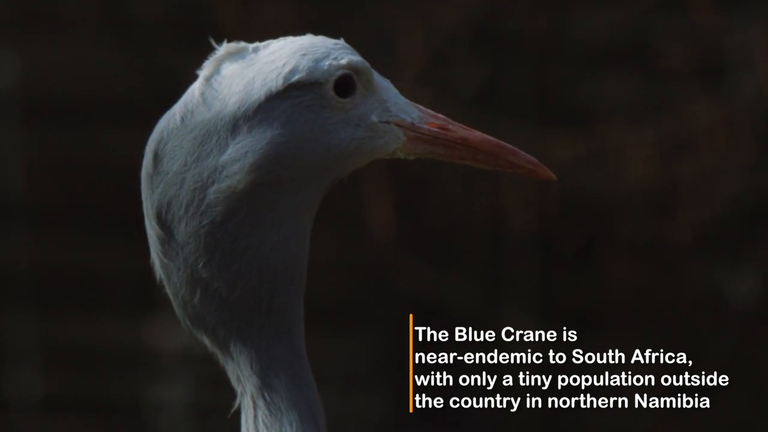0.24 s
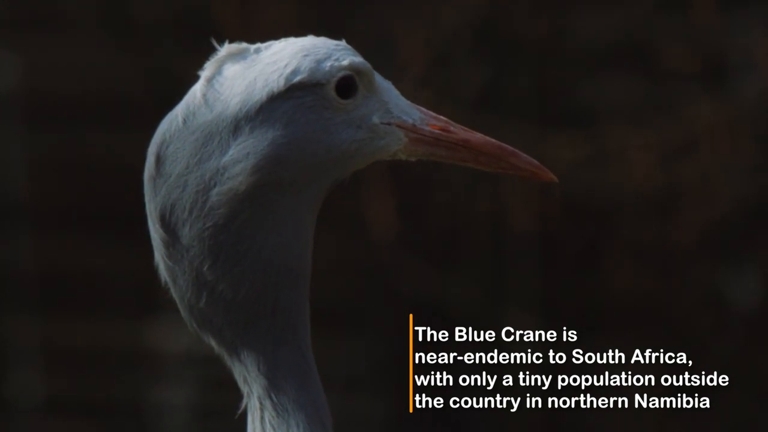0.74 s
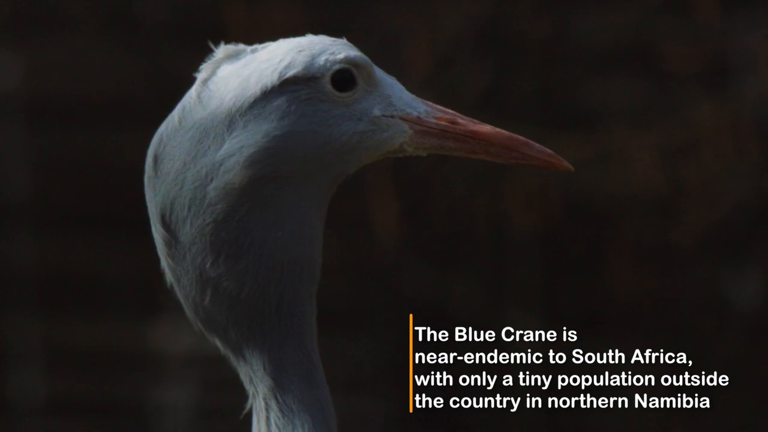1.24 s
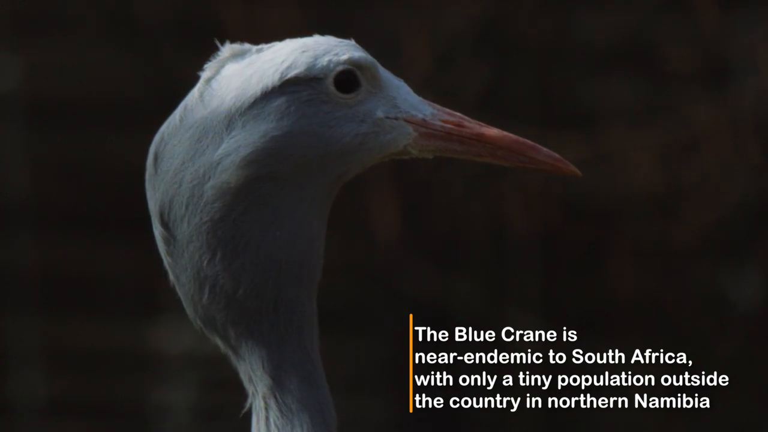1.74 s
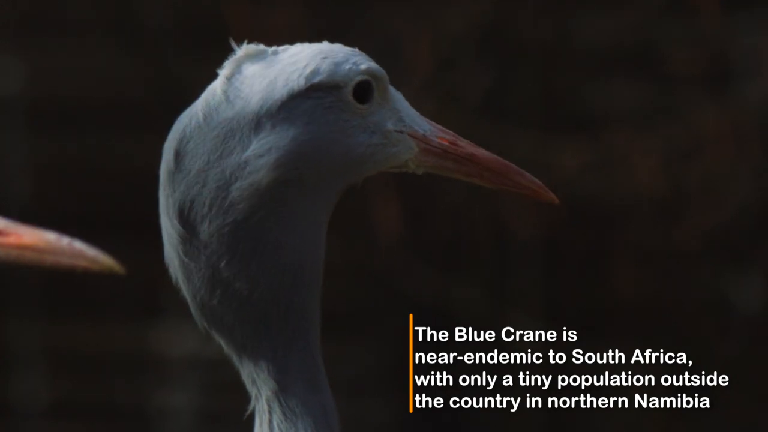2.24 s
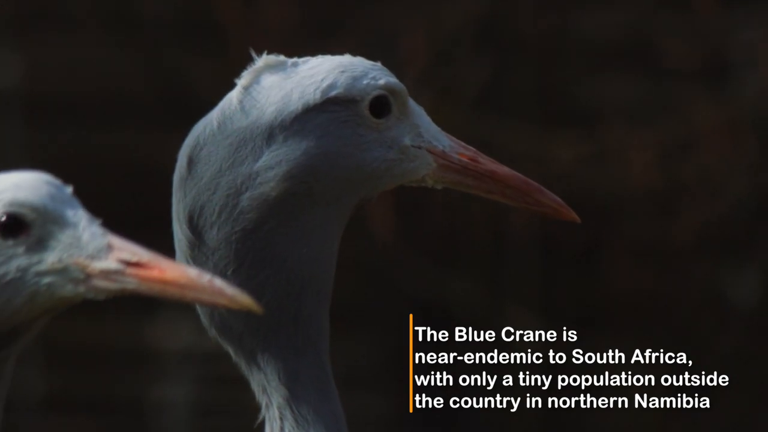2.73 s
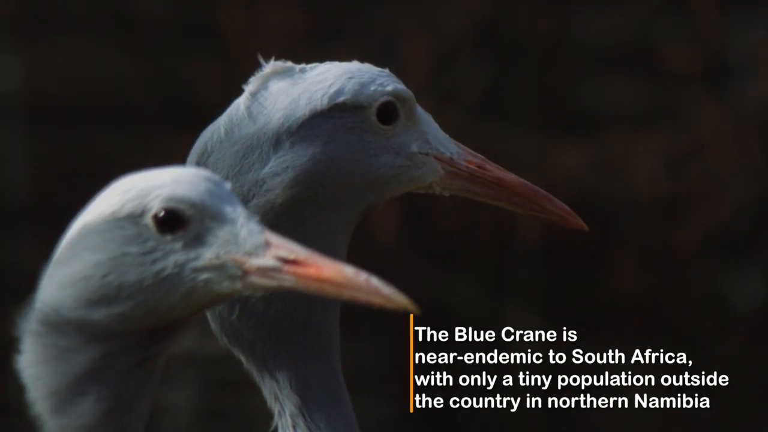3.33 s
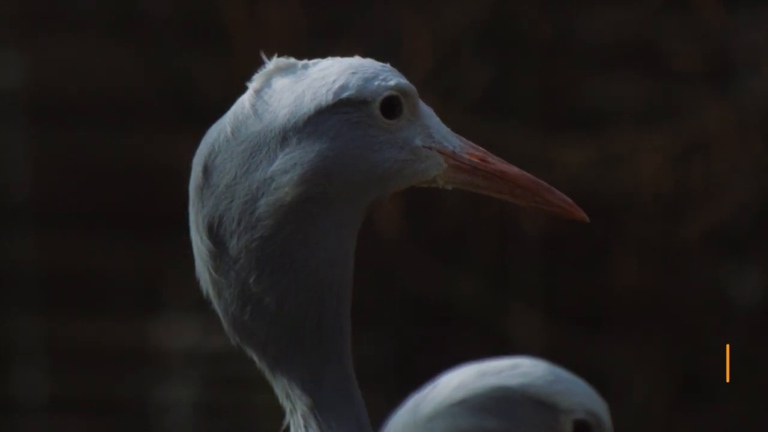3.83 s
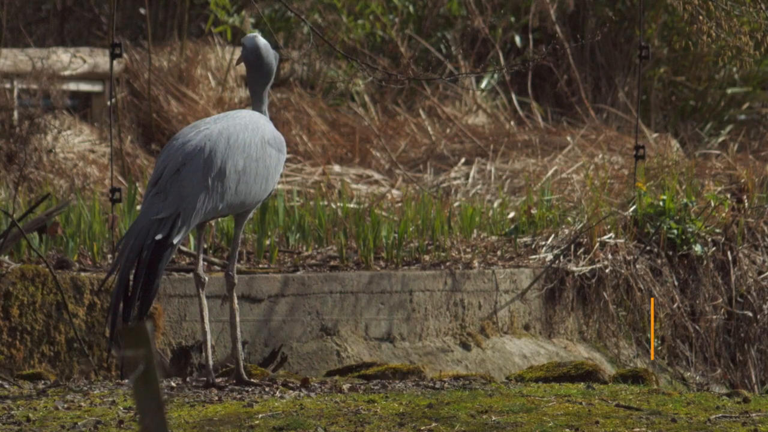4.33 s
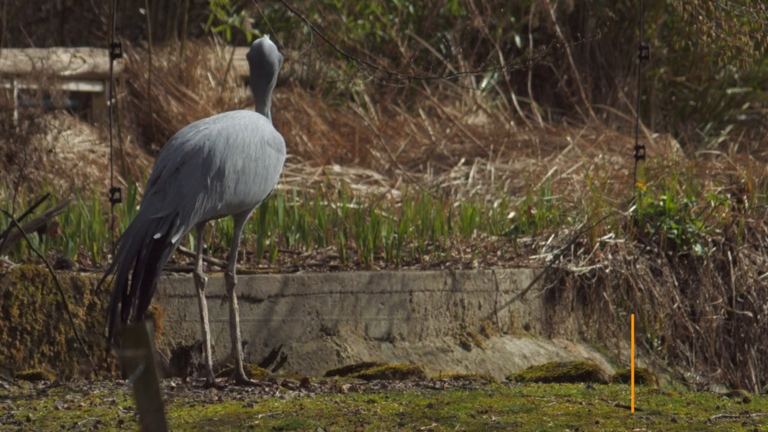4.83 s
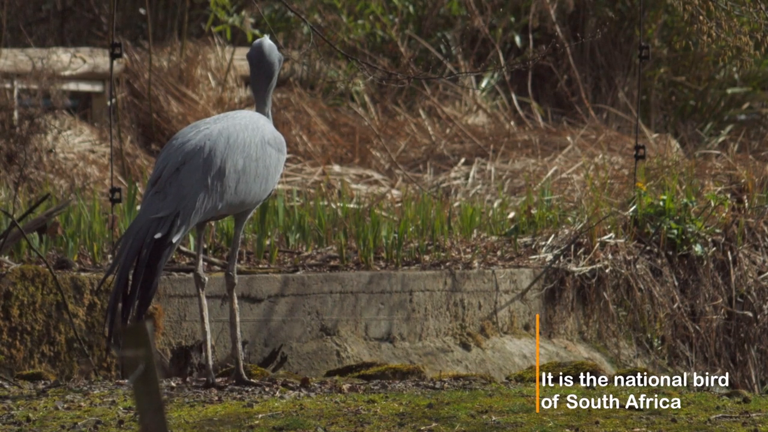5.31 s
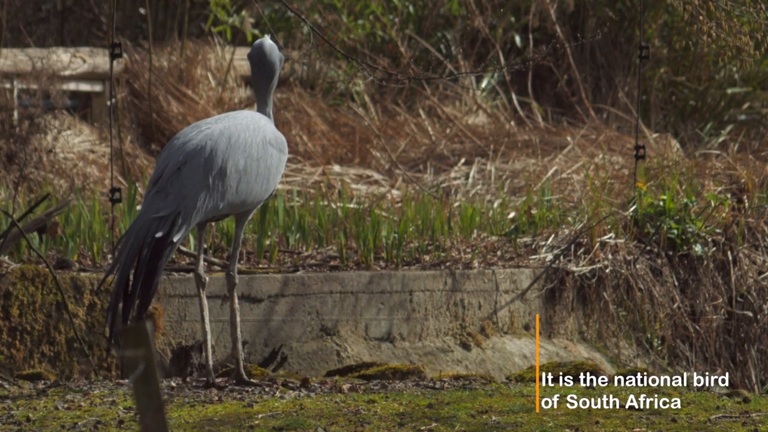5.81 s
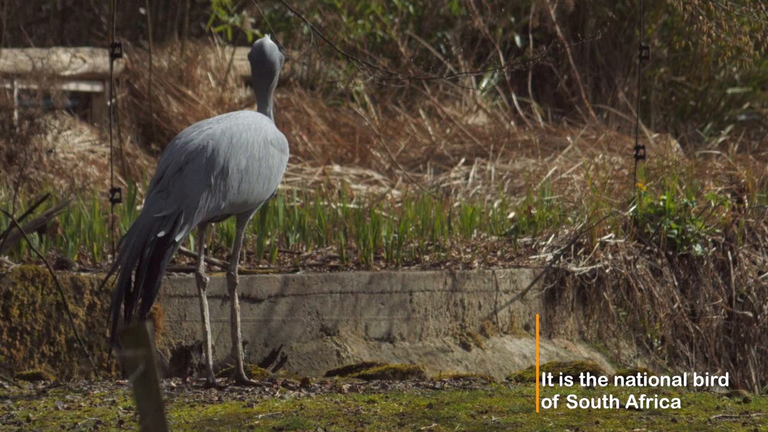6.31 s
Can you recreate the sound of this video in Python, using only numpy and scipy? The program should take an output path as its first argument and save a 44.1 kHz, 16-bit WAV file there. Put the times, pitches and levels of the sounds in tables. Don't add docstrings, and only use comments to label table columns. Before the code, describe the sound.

A quiet open outdoor place with soft, wide air hiss and faint distant birds chirping and warbling. At about 0.5 s something hollow is tapped dully once. From 0.9 to 1.4 s a nearby songbird gives thin, high falling whistles and quick flicks, then from 1.4 to 3.05 s a fast, steady trill of clear falling notes, about thirteen a second. At 2.9 s a deep-voiced crane swells into a loud, rasping rattle of about ten rapid croaks, overlapped from 3.1 to 3.6 s by a higher crane. The deep bird calls again at 3.85-4.3 s, the higher at 4.1-4.6, deep at 4.75-5.2, higher at 5.4-5.9, and deep at 5.7-6.2. Each run starts weaker, rises in pitch, then sags and usually fades. Faint far chirps and a high warble close the last 0.4 s. Cranes sound close and central, with short reflections from ground and bushes.

```python
import sys
import numpy as np
from scipy import signal
from scipy.fft import rfft, irfft
from scipy.io import wavfile
from scipy.ndimage import uniform_filter1d, map_coordinates

SR = 44100
rng = np.random.default_rng(int(sys.argv[2]) if len(sys.argv) > 2 else 0)


def digitize_waveform(pressure):
    field = np.atleast_2d(pressure).T
    bounded = np.clip(field, -1, 1)
    quanta = np.round(bounded * 32767).astype(np.int16)
    wavfile.write(sys.argv[1], SR, quanta)


def ratio(d):
    e = np.asarray(d, float) / 20
    return 10 ** e


N = 289296

# [pitch_hz, density_db per Hz]
AIR = [(12, -38), (20, -2.5), (103, 0), (362, -0.5), (686, -4), (932, -5.5), (2150, -14), (7310, -23),
       (14300, -24), (15500, -25)]
# [pitch_hz, likeness -1..1]
ALIKE = [(60, -0.79), (700, -0.5), (1500, -0.3), (3000, 0.24), (7000, 0.5), (15000, -0.0035)]
# [time_s, level_db]
TWITTER = [(0, -74.5), (.8, -82), (3, -76), (4.3, -74.5), (4.35, -64), (4.42, -77), (4.57, -65), (4.7, -86),
           (6.2, -70.5), (6.56, -71.5)]
# [pitch_hz, density_db per Hz]
CHORUS = [(2500, -29), (3500, -12.5), (4200, -3), (5000, 0), (5700, -10.5), (6300, -12), (9000, -44)]
# [pitch_hz, density_db per Hz]
KNOCK = [(120, -33), (250, -7), (680, 6), (1100, -7.5), (2000, -8), (2700, -40)]

# [start_s, end_s, start_hz, end_hz, level_db]
GLIDES = [(0, 0.11, 5330, 2930, -66), (.163, .276, 2820, 2870, -73), (.557, .644, 8400, 6530, -76),
          (.63, .685, 4900, 3200, -68), (.645, .69, 3820, 3450, -62.5), (.468, .5, 5900, 5100, -72),
          (.676, .694, 4700, 4900, -68), (.681, .708, 3780, 4450, -65), (.8, 1.03, 2490, 2740, -73.5),
          (1.172, 1.203, 5230, 4640, -62), (.36, 0.44, 7150, 7000, -83), (1.24, 1.272, 5100, 4600, -65),
          (1.196, 1.285, 4440, 3930, -72), (5.38, 5.41, 5440, 4600, -69), (6.215, 6.275, 5000, 6000, -66.5),
          (6.27, 6.36, 5860, 5680, -70), (6.505, 6.53, 4600, 4450, -79), (6.347, 6.372, 5000, 3500, -66),
          (.78, .815, 2750, 2800, -70), (5.33, 5.37, 4100, 5000, -72)]
# [start_s, end_s, start_hz, end_hz, level_db]
HOOKS = [
    (.338, 0.58, 3500, 3000, -70),
    (1.198, 1.303, 2000, 2090, -67.5),
    (2.023, 2.11, 1755, 3400, -70),
    (2.129, 2.199, 3900, 1600, -71),
    (1.258, 1.3, 1900, 4300, -71),
]
# [start_s, end_s, start_hz, end_hz, level_db]
LIFTS = [
    (1.335, 1.385, 3000, 4400, -72),
    (6.53, 6.56, 3100, 3500, -73),
    (.5, .545, 2200, 4600, -81.5),
    (.776, .831, 6700, 6410, -68),
]
# [start_s, end_s, start_hz, end_hz, level_db]
STEADY = [
    (3.475, 3.6, 5780, 5680, -69),
    (3.6, 3.8, 5700, 5660, -77),
    (.55, .64, 7100, 7080, -78),
]
# [start_s, end_s, start_hz, end_hz, level_db]
HOARSE = [
    (1.8, 1.86, 2650, 2500, -73),
    (1.83, 1.9, 2100, 1880, -74),
    (2.13, 2.16, 3870, 3650, -71),
    (2.19, 2.23, 3230, 2190, -77),
]
# [start_s, end_s, base_hz, top_hz, level_db]
ARCHES = [
    (0.811, 0.858, 2610, 3540, -64),
    (0.938, 0.971, 2670, 3450, -66.5),
    (1.064, 1.122, 2680, 3230, -70),
]
# [start_s, level_db]
FALLS = [
    (.889, -62.5),
    (.995, -63),
    (5.187, -78),
    (5.283, -69),
]
# [start_s, level_db]
COOS = [
    (1.367, -70),
    (1.57, -74),
    (1.7, -76),
]
# [time_s, pitch_hz, level_db]
WARBLES = [
    [(.18, 3300, -70), (.21, 4290, -59), (.228, 4070, -63), (.247, 3950, -69), (.262, 4350, -73),
     (.272, 4950, -64), (.285, 5350, -67), (.3, 6300, -76)],
    [(.355, 3550, -70), (.39, 3330, -65), (.42, 3580, -60.5), (.455, 3560, -69), (.48, 3060, -67),
     (.505, 2850, -69)],
    [(.56, 3130, -77), (.58, 2950, -66), (.605, 3170, -63), (.635, 3020, -71), (.66, 3460, -64),
     (.69, 3700, -68)],
    [(6.41, 5100, -65), (6.43, 5530, -57.5), (6.455, 5740, -61), (6.48, 6000, -67), (6.5, 5700, -72),
     (6.515, 5550, -64), (6.53, 5500, -74)],
]

# [time_s, pitch_hz, level_db]
OPENING = [
    [(.893, 8500, -68), (.9, 8900, -57), (.95, 8680, -51), (1, 8350, -47), (1.02, 8050, -50.5),
     (1.033, 6800, -53), (1.036, 6500, -73)],
    [(1.097, 3820, -60), (1.104, 6340, -40), (1.11, 7800, -62), (1.122, 8340, -61)],
    [(1.105, 4860, -48), (1.112, 6334, -44), (1.12, 7140, -51.5), (1.15, 6710, -41), (1.2, 6505, -38.5),
     (1.225, 6410, -35.5), (1.234, 6240, -37), (1.24, 5760, -56)],
    [(1.303, 4770, -60), (1.308, 6400, -41.5), (1.314, 8140, -63), (1.325, 8000, -57)],
    [(1.308, 4360, -53), (1.314, 5920, -47), (1.322, 7000, -47), (1.338, 6720, -42), (1.35, 6350, -36.5),
     (1.358, 6000, -41), (1.368, 5360, -36), (1.376, 4800, -45)],
]
# [start_s, length_s, level_db, pitch_hz at the loudest, pause of the fall 0-1]
TRILL = [(1.411, .039, -34.5, 5190, 0.48), (1.483, 0.036, -34, 5186, 0.26),
         (1.552, 0.037, -34.5, 5170, 0.22), (1.624, 0.036, -34, 5150, 0.32),
         (1.691, 0.039, -35.5, 5106, 0.37), (1.762, 0.038, -34.5, 5125, 0.28),
         (1.834, .038, -33.5, 5140, 0.2), (1.908, 0.037, -34, 5150, 0.38),
         (1.982, 0.039, -33.5, 5116, 0.38), (2.055, 0.04, -36, 5174, 0.75), (2.137, 0.037, -34, 5135, 0.2),
         (2.215, 0.039, -36.5, 5090, 0.65), (2.301, 0.035, -33.5, 5155, 0.5),
         (2.378, 0.039, -34, 5160, 0.3), (2.457, 0.038, -34.5, 5170, 0.23),
         (2.533, 0.04, -33.5, 5170, 0.34), (2.613, 0.041, -34, 5144, 0.32), (2.691, .04, -34, 5125, 0.2),
         (2.765, 0.041, -33, 5140, 0.18), (2.844, .041, -35, 5150, .4), (2.927, .037, -34, 5130, 0.27),
         (3.009, 0.037, -35, 5146, 0.4)]
# [share of note, level_db]
SWELL = [(-.05, -79), (0, -14), (.4, -1), (.75, 3), (.88, 0), (.96, -6.5), (1.02, -26.5), (1.12, -25.5)]

# [start_s, span_s first to last burst, first_db, last_db]
DEEP_1 = [
    (2.88, 0.0022, -57, -58.5),
    (2.938, 0.016, -48, -53),
    (2.995, 0.02, -41, -43.5),
    (3.0535, 0.02, -37.5, -44),
    (3.111, 0.026, -38, -42),
    (3.166, 0.02, -36.5, -45.5),
    (3.2187, .009, -37, -42.5),
    (3.2685, 0.0094, -37.5, -43),
    (3.3162, 0.011, -40.5, -43),
    (3.3598, .009, -45, -45),
]
DEEP_2 = [
    (3.8475, 0.022, -47, -41),
    (3.909, 0.018, -38, -39),
    (3.9672, 0.02, -38.5, -39),
    (4.0255, 0.019, -37, -38.5),
    (4.0807, 0.011, -37.5, -39),
    (4.1322, 0.014, -37.5, -42),
    (4.1812, 0.0095, -38.5, -48),
    (4.2255, .0065, -39, -46),
    (4.267, .0012, -46, -45.5),
]
DEEP_3 = [
    (4.756, 0.021, -47.5, -42),
    (4.8175, 0.02, -37.5, -39.5),
    (4.8757, .021, -37.5, -37),
    (4.9333, 0.022, -36.5, -37.5),
    (4.9887, 0.017, -36, -38.5),
    (5.0414, 0.0078, -36.5, -36),
    (5.0882, 0.015, -35.5, -43),
    (5.1336, 0.0084, -37.5, -45),
    (5.1774, 0.0073, -38, -50.5),
    (5.2245, 0.0013, -54.5, -53),
]
DEEP_4 = [
    (5.727, 0.025, -43.5, -42.5),
    (5.7855, 0.019, -36.5, -39),
    (5.8392, 0.019, -37, -38),
    (5.9003, 0.028, -37, -36),
    (5.9533, 0.018, -37.5, -37),
    (6.005, 0.011, -37, -36.5),
    (6.0507, 0.0096, -37, -38),
    (6.097, 0.0085, -37.5, -46.5),
    (6.1404, 0.0061, -38, -45.5),
    (6.183, 0.015, -43.5, -52),
]
# [start_s, span_s first to last burst, first_db, last_db]
HIGH_1 = [
    (3.1052, 0.019, -42, -46),
    (3.164, 0.02, -41, -40.5),
    (3.2225, 0.019, -41.5, -37.5),
    (3.2812, 0.02, -39, -38),
    (3.3376, 0.025, -40, -36.5),
    (3.3912, 0.011, -40.5, -37),
    (3.4442, 0.0079, -39, -38),
    (3.4936, 0.01, -38.5, -42),
    (3.541, 0.01, -38.5, -46.5),
    (3.5887, 0.015, -45.5, -52.5),
]
HIGH_2 = [
    (4.0995, 0.03, -45, -43),
    (4.162, 0.023, -37, -41.5),
    (4.22, 0.022, -36, -40),
    (4.2786, 0.019, -37, -38.5),
    (4.3343, 0.02, -37, -43),
    (4.3868, 0.0085, -38, -38.5),
    (4.4357, 0.0083, -37, -41),
    (4.4842, 0.011, -37.5, -43.5),
    (4.5325, 0.0079, -39.5, -47),
    (4.58, 0.0031, -49, -53),
]
HIGH_3 = [
    (5.397, .0018, -54, -51),
    (5.448, 0.021, -43, -48),
    (5.5051, 0.02, -39.5, -41),
    (5.563, 0.02, -38.5, -41.5),
    (5.6193, 0.02, -37, -41),
    (5.6748, 0.018, -36.5, -42.5),
    (5.7268, 0.0078, -40, -37.5),
    (5.778, 0.008, -39, -44),
    (5.8266, 0.011, -37, -51),
    (5.8753, 0.0098, -38.5, -38),
]
# [croaks, overtones_db re fundamental, beak tilt at start and at end in db per octave]
RUNS = [
    (DEEP_1, 1.3, -6, 0.1),
    (DEEP_2, 10.6, 0.087, -0.66),
    (DEEP_3, 9.9, -2.2, 3.7),
    (DEEP_4, 11.5, 1, -0.058),
    (HIGH_1, 2.07, -4.8, -4.2),
    (HIGH_2, 2.9, -1.22, -1.69),
    (HIGH_3, 5.12, 0.28, 0.22),
]
# [pitch_hz, ..]
PITCH = [(606, 689, 814, 816, 862, 908, 870, 850, 870, 840), (762, 891, 917, 945, 929, 885, 893, 862, 710),
         (711, 928, 954, 977, 986, 995, 934, 915.7, 880, 766),
         (808, 900, 943, 940, 1020, 990, 932, 906, 888, 780),
         (953, 1052, 1100, 1123, 1120, 1116.5, 1112, 1060, 995, 879),
         (946, 1100, 1146, 1087, 1106, 1125, 1063, 1022, 970, 807),
         (851, 1017, 1093, 1110, 1155, 1180, 1130, 1120, 1080, 1088)]
# [lift_db above 7.5 kHz, half_db of the partial midway from first to second]
BREATHY = [(7, -39), (-5, -26), (-1, -20), (-1, -29), (6.5, -15), (4, -26), (2.5, -28)]
THROAT_OF_RUN = (0, 0, 0, 0, 1, 2, 1)
# [pitch_hz, density_db per Hz]
THROAT = [(900, -27), (1400, 0.5), (2000, 4.5), (2400, -4.5), (3100, 6), (4300, -7), (5200, 0.5),
          (6500, -11), (9000, -17.5), (15500, -39.5)]
# [pitch_hz, density_db per Hz]
HIGH_THROAT = [(900, -41), (1400, 3.5), (2000, 2), (2600, -1), (3400, 1.5), (4300, -2.5), (5400, 2),
               (6600, -3), (7300, -15), (15500, -31)]
# [pitch_hz, density_db per Hz]
TURNED_THROAT = [(900, -31), (1400, 6), (2000, 7), (2600, -2), (3300, 0.5), (4300, -19.5), (5400, -13.5),
                 (7000, -19.5), (9000, -31.5), (15500, -32)]
# [pitch_hz, level_db]
PIPE = [(400, -20), (620, -2.5)]
# [pitch_hz, level_db]
APART = [(1400, -8.5), (3000, -3), (6000, 2)]


def unit(x):
    return x / np.sqrt(np.mean(x ** 2) + 1e-20)


def along(points, hz):
    f, v = np.transpose(points)
    return np.interp(np.log(hz + 1), np.log(f + 1), v)


def wobble(rate, size=N):
    knots = rng.standard_normal(int(size * rate / SR) + 4)
    return map_coordinates(knots, [np.arange(size) * rate / SR])


def coloured(x, spectrum):
    gain = ratio(along(spectrum, np.fft.rfftfreq(2048, 1 / SR)))
    cep = irfft(np.log(gain + 1e-4))
    cep = np.r_[cep[0], 2 * cep[1:1024], np.zeros(1024)]
    return signal.oaconvolve(x, irfft(np.exp(rfft(cep))))[:N]


def add(track, s, sound):
    part = track[max(round(s * SR), 0):][:len(sound)]
    part += sound[:len(part)]


def scatter(t, t60, rise_s, channels=2):
    fade = rng.standard_normal((channels, len(t))) * ratio(-60 * t / t60) * (1 - np.exp(-t / rise_s))
    return fade / np.linalg.norm(fade[0])


def tail(x, t60, channels=2):
    t = np.arange(SR // 3) / SR
    return signal.fftconvolve(x[None], scatter(t, t60, 0.0014, channels), axes=1)[:, :N]


def echoes(x, t60):
    out, step = np.zeros((2, N + SR)), SR // 5
    t = np.arange(SR // 12) / SR
    for a in range(0, N, step):
        answer = signal.fftconvolve(x[None, a:a + step], scatter(t, t60, 0.00089), axes=1)
        out[:, a:a + answer.shape[1]] += answer
    return out[:, :N]


def ground(x, t60, db, even):
    out, step, m = np.zeros((2, N + SR)), SR // 10, 8192
    t = np.arange(SR // 12) / SR
    for a in range(0, N, step):
        direct = [[1], [0]]
        paths = rfft(ratio(db) * scatter(t, t60, 0.0049), m) + direct
        cep = irfft(np.log(np.abs(paths) + 0.0052))
        cep = np.c_[cep[:, 0], 2 * cep[:, 1:m // 2]]
        cep = cep - cep[:, :1] * (np.arange(m // 2) == 0)
        response = irfft(paths * np.exp(-even * rfft(cep, m)))
        answer = signal.fftconvolve(x[None, a:a + step], response, axes=1)
        out[:, a:a + answer.shape[1]] += answer
    return out[:, :N]


def air(db):
    hz = np.fft.rfftfreq(N, 1 / SR)
    turn = np.arccos(np.clip(along(ALIKE, hz), -.95, .95)) / 2
    balance = [1 / np.tan(turn), np.ones_like(hz)]
    noise = rfft(rng.standard_normal((2, N)))
    mid, side = irfft(noise * ratio(along(AIR, hz)) * balance, N)
    return ratio(db) * unit(np.array([mid + side, mid - side]))


def twitter():
    z = signal.stft(rng.standard_normal(N), nperseg=256)[2]
    field = uniform_filter1d(rng.standard_normal(z.shape), size=5, axis=0)
    field = uniform_filter1d(field, size=12, axis=1)
    patchy = signal.istft(z * ratio(5.2 * unit(field)), nperseg=256)[1]
    level_db = np.interp(np.arange(N) / SR, *np.transpose(TWITTER))
    return ratio(level_db) * unit(coloured(patchy, CHORUS))


def knock(s=.529, db=-40):
    out, t = np.zeros(N), np.arange(SR // 10) / SR
    add(out, s, ratio(db - 60 * t / 0.14) * (1 - np.exp(-t / 0.0013)) * rng.standard_normal(len(t)))
    return coloured(out, KNOCK)


def whistle(hz, db, octave_db):
    phase = 2 * np.pi * np.cumsum(hz) / SR
    return ratio(db) * (np.sin(phase) + ratio(octave_db) * np.sin(2 * phase))


def sung(song_notes, flutter_db, octave_db):
    song = np.zeros(N)
    for note in song_notes:
        s, hz, db = np.transpose(note)
        t = np.arange(s[0], s[-1], 1 / SR)
        pitch_hz, level_db = uniform_filter1d([np.interp(t, s, hz), np.interp(t, s, db)], size=90)
        level_db = level_db + flutter_db * wobble(170, size=len(t))
        add(song, s[0], signal.windows.tukey(len(t), .12) * whistle(pitch_hz, level_db, octave_db))
    return song


def far_chirps():
    clear, rough = 0.21, 2.1
    repeats = [(s, s + 0.023, 4720, 4320, -60 - 9 * (s - 1.3)) for s in 1.312 + .0745 * np.arange(9)]
    repeats += [(s, s + 0.034, 6250, 4880, db) for s, db in FALLS]
    repeats += STEADY
    coos = [(s, s + 0.089, 2120, 2040, db) for s, db in COOS]
    shapes = [(GLIDES, .5, 1), (repeats, .5, clear), (HOARSE + coos, .5, rough),
              (HOOKS, 0.73, rough / 2), (LIFTS, 0.12, 1)]
    chirps = []
    for rows, ahead, waver in shapes:
        for s, e, a, c, db in rows:
            chirps.append((s, e, a, a + ahead * (c - a), c, db, waver))
    bank_s, bank_db = .013, -7.5
    banked = [(s + bank_s, e + bank_s, a, top, db + bank_db) for s, e, a, top, db in ARCHES]
    return chirps + [(s, e, a, top, a, db, clear) for s, e, a, top, db in ARCHES + banked]


def far_birds(waver_hz=45, flutter_db=3):
    song = sung(WARBLES, flutter_db=2.5, octave_db=-60)
    for start, end, a_hz, b_hz, c_hz, db, rough in far_chirps():
        u = np.linspace(-1, 1, round((end - start) * SR))
        hz = b_hz + (c_hz - a_hz) / 2 * u + ((a_hz + c_hz) / 2 - b_hz) * u ** 2
        hz = hz + rough * waver_hz * wobble(151.0, size=len(u))
        level_db = db + rough ** .5 * flutter_db * wobble(199.0, size=len(u))
        add(song, start, (1 - u ** 8) * whistle(hz, level_db, octave_db=-60))
    return song


def songbird():
    song = sung(OPENING, flutter_db=1.0, octave_db=-45)
    for s, length, db, pitch_hz, pause in TRILL:
        early_hz = 5543 + 207 * np.exp((TRILL[0][0] - s) / 0.46) + 21000 * (length - .039)
        u = np.arange(-.05 * length, 1.13 * length, 1 / SR) / length
        hz = early_hz + (4960 - early_hz) * (u - .125) / 0.69
        hz = hz - 900 * np.clip((u - .93) / 0.232, 0, 1) ** 1.4
        hz = hz + pitch_hz - 5150
        hz = hz - pause * 170 * np.sin(2 * np.pi * np.clip(u, 0, 1))
        hz = hz - 250 * np.exp(-(u + 0.0282) / 0.009)
        hz = hz + 25 * wobble(218, size=len(u)) + 15 * wobble(56, size=len(u))
        level_db = uniform_filter1d(np.interp(u, *np.transpose(SWELL)), size=60)
        level_db = level_db + 0.14 * wobble(220, size=len(u))
        octave_db = -34.5 + 10 * (s - 5.0) + 22 * u
        add(song, s - .05 * length, whistle(hz, db + level_db, octave_db))
    return song


def bursts():
    gap_s, longest_s = .0105, .0225
    shake, uneven_db = 0.0164, -0.5
    for run, bird, breathy, pitches in zip(RUNS, THROAT_OF_RUN, BREATHY, PITCH):
        croaks, bright_db, tilt_in, tilt_out = run
        chance = rng.standard_normal((len(croaks), 3, 2))
        for (s, span, first_db, last_db), luck, hz in zip(croaks, chance, pitches):
            done = (s - croaks[0][0]) / (croaks[-1][0] - croaks[0][0])
            sag = min(0.0436 + 0.1606 * done, 0.15) - .12 * np.exp(-done / 0.027)
            third = sag * (0.356 + 2.1 * done) if sag > 0 else sag
            drops = (0, sag, third)
            extra = min(round(span / gap_s), 2)
            for k in range(extra + 1):
                u = k / max(extra, 1)
                start_s = s + u * min(span, longest_s)
                level_db = first_db + u * (last_db - first_db) + uneven_db * luck[k, 0] * (0 < k < extra)
                pitch_hz = hz * (1 - drops[k] + shake * luck[k, 1] * (k > 0))
                overtones_db = bright_db - 1.5 * k * (done + .05)
                beak_db = tilt_in + done * (tilt_out - tilt_in)
                yield start_s, level_db, pitch_hz, overtones_db, beak_db, bird, *breathy


def cranes(rise=.0024, fall=0.0039, flat=2.17, snap=4.0, rough=0.55, scatter_db=1.6, throat_db=-16, leak=0.11):
    tone, pulses, hiss = np.zeros(N), np.zeros(N), np.zeros((3, N))
    throats = THROAT, HIGH_THROAT, TURNED_THROAT
    smear = (.9, .3, .3)
    t = np.arange(SR // 70) / SR
    k = np.arange(2, 19)[:, None]
    opening = t < 2 * rise
    distance = np.abs((t - 2 * rise) / np.where(opening, rise, fall))
    shape = -np.exp(-distance ** np.where(opening, snap, flat))
    shape = shape - leak * np.hanning(len(t))
    for s, db, hz, bright_db, beak_db, bird, lift_db, half_db in bursts():
        start = s - 2 * rise
        bend = 1 + .055 * (t / rise - 2) + .046 * wobble(900, size=len(t))
        phase = 2 * np.pi * (np.cumsum(hz * bend) / SR + rng.random())
        tilt_db = beak_db * np.log2(k * hz / 3000) + lift_db * (k * hz > 7500)
        tilt_db = tilt_db + scatter_db * rng.standard_normal(k.shape)
        overtones = np.cos(k * phase + smear[bird] * rng.standard_normal(k.shape))
        comb = ratio(db + bright_db + tilt_db) * shape * overtones
        voiced = comb * ratio(along(throats[bird], k * hz * uniform_filter1d(bend, size=60)))
        breath = rough * ratio(lift_db / 2) * comb.sum(0) * rng.standard_normal(len(t))
        add(tone, start, ratio(db) * shape * (np.cos(phase) + ratio(half_db) * np.cos(3 * phase / 2)))
        add(pulses, start, voiced.sum(0))
        add(hiss[bird], start, breath)
    return coloured(tone, PIPE) + ratio(throat_db) * (pulses + sum(map(coloured, hiss, throats)))


def scene():
    big, near, far = cranes(), songbird(), far_birds()
    mid, side = ground(big, t60=0.046, db=-4, even=0.52) + ratio(-17.5) * tail(big, t60=0.31)
    side = coloured(side + ratio(-24.0) * big, APART)
    song = near + ratio(-14.5) * echoes(near, t60=0.038)[0]
    song = song + ratio(-24.0) * tail(near, t60=0.83, channels=1)
    song = song + far + ratio(-4.5) * tail(far, t60=0.42, channels=1)
    return mid + side * [[1], [-1]] + song + twitter() + knock() + air(db=-65.0)


def masked(x, under_db=35.5, up_db=30, down_db=90, chance_db=3):
    z = signal.stft([x[0] + x[1], x[0] - x[1]], nperseg=2048)[2]
    bands = z[:, :1024].reshape(2, 64, 16, -1)
    level = 10 * np.log10((np.abs(bands) ** 2).sum(2) + 1e-20)
    octaves = np.log2(np.arange(1, 65)[:, None] / np.arange(1, 65))
    spread = np.where(octaves > 0, up_db * octaves, -down_db * octaves)
    mask = (level.max(0)[None] - spread[..., None]).max(1) - under_db
    keep = level > mask + chance_db * rng.standard_normal(level.shape)
    keep[:, 46:] = False
    keep = np.pad(np.repeat(keep, 16, axis=1), [(0, 0), (0, 1), (0, 0)])
    mid, side = signal.istft(z * keep, nperseg=2048)[1][:, :N] / 2
    return np.array([mid + side, mid - side])


def starved(x, loud_db=-50, from_hz=7500, to_hz=16500, spare_db=4):
    hz, _, z = signal.stft(x, SR, nperseg=256)
    power = np.abs(z.mean(0)) ** 2
    busy = uniform_filter1d(power[4:20].sum(0), size=14) > ratio(2 * loud_db)
    luck = rng.random((33, z.shape[2] // 4 + 1))
    luck = np.repeat(np.repeat(luck, 4, axis=0), 4, axis=1)[:129, :z.shape[2]]
    usual = np.median(power, axis=1, keepdims=True)
    faint = uniform_filter1d(power, size=4, axis=0) < ratio(2 * spare_db) * usual
    drop = busy & faint & (luck < (hz[:, None] - from_hz) / (to_hz - from_hz))
    return signal.istft(z * (~drop & (hz[:, None] < 15600)), nperseg=256)[1][:, :N]


def low_pass(x):
    return signal.sosfilt(signal.butter(12, 16400, fs=SR, output="sos"), x)


def record(dry):
    mix = starved(masked(dry))
    return low_pass(mix)


dry = scene()
out = record(dry)
digitize_waveform(out)
```